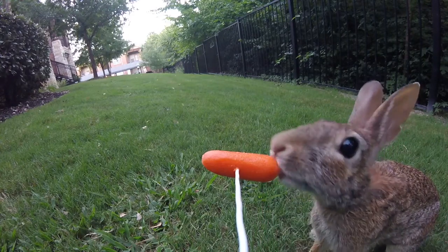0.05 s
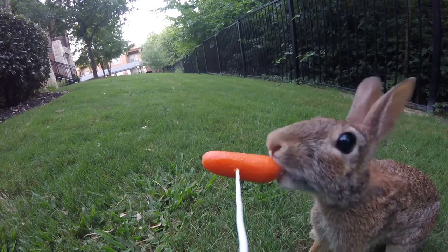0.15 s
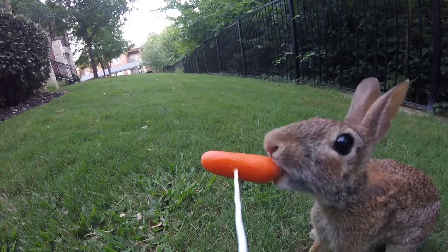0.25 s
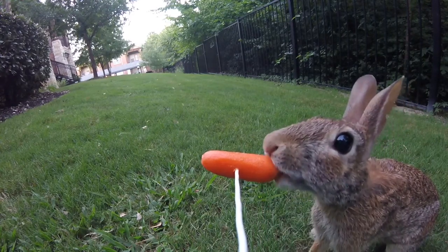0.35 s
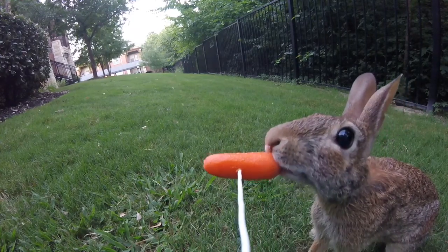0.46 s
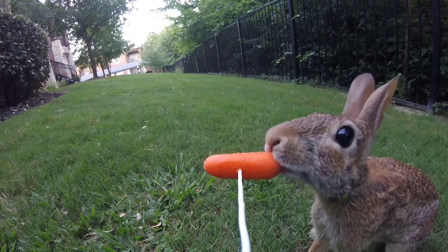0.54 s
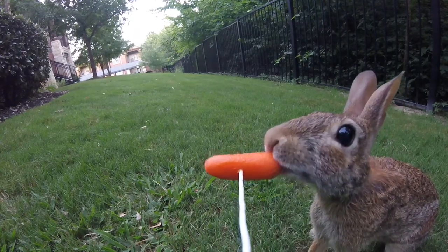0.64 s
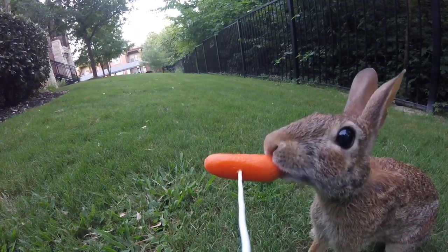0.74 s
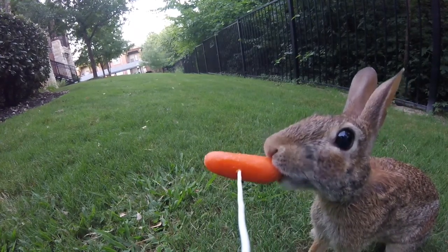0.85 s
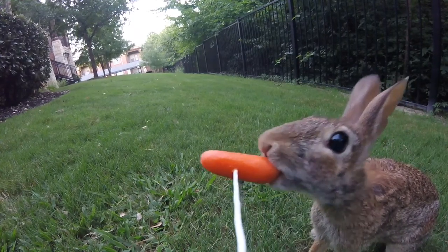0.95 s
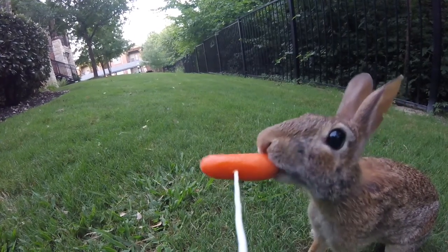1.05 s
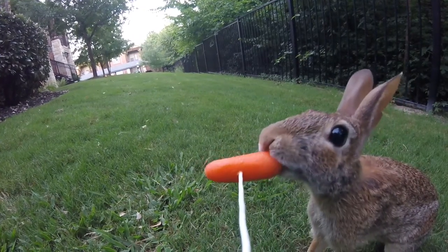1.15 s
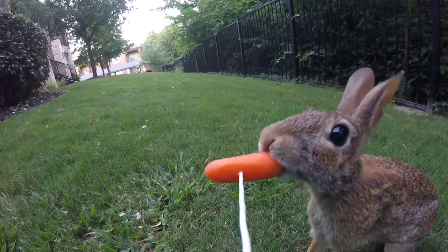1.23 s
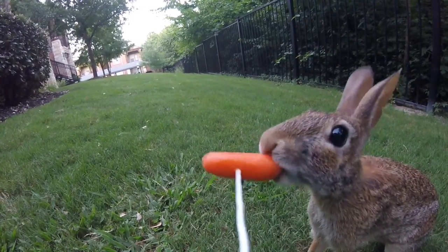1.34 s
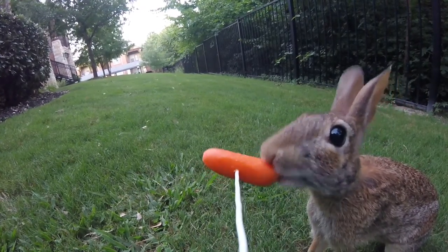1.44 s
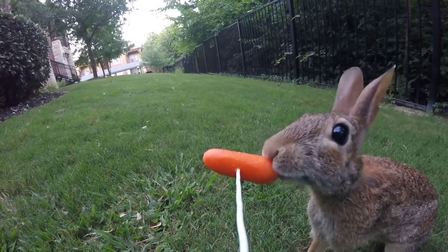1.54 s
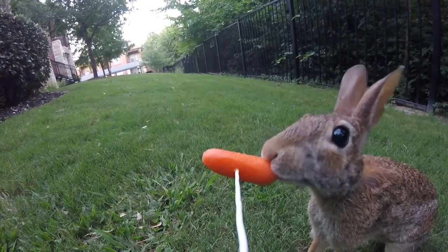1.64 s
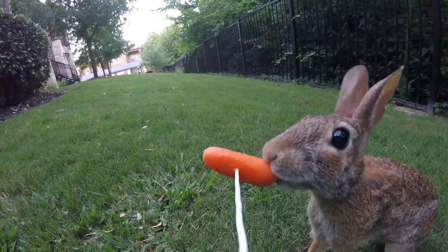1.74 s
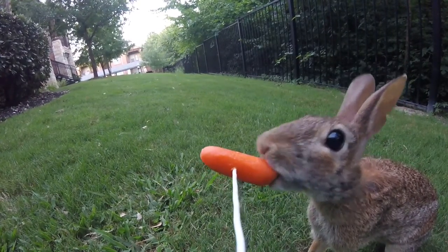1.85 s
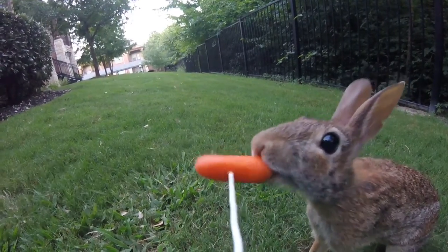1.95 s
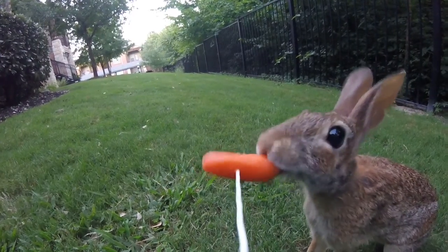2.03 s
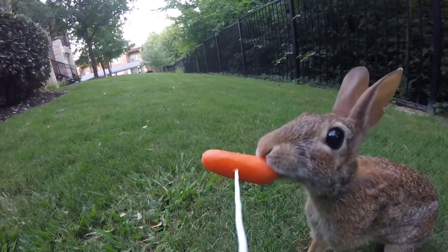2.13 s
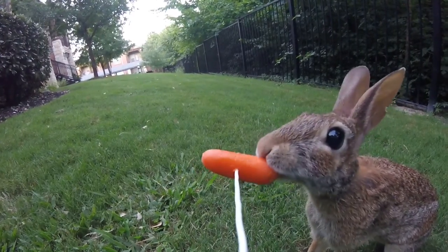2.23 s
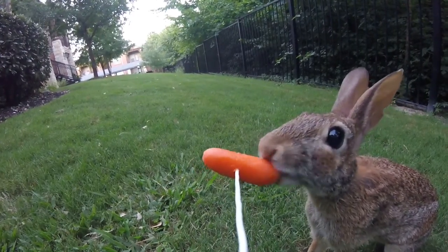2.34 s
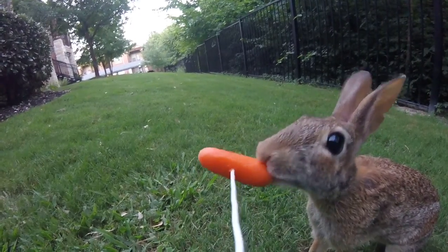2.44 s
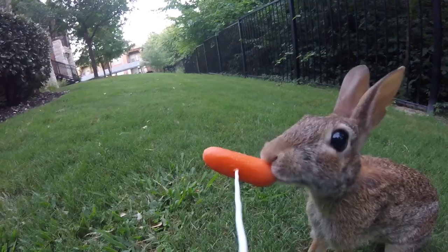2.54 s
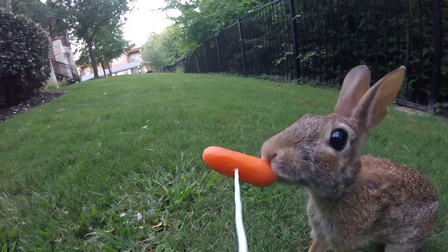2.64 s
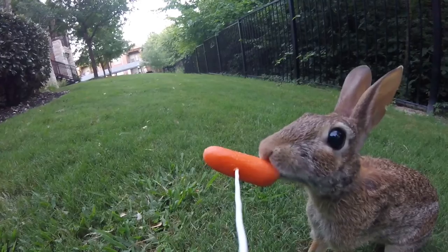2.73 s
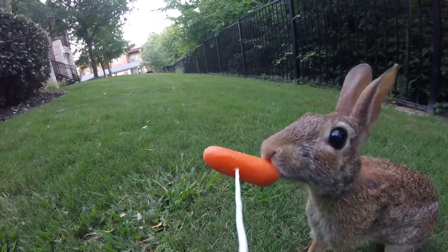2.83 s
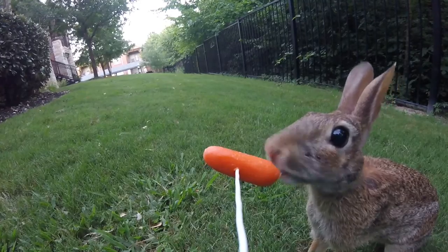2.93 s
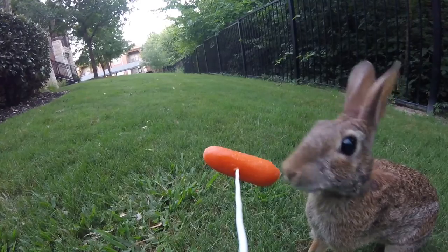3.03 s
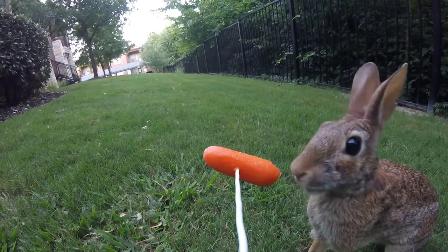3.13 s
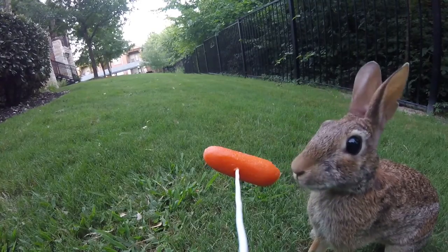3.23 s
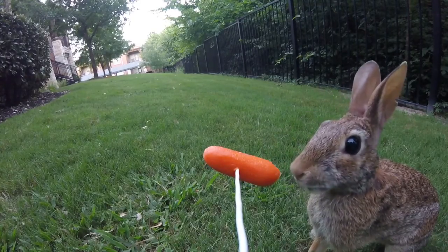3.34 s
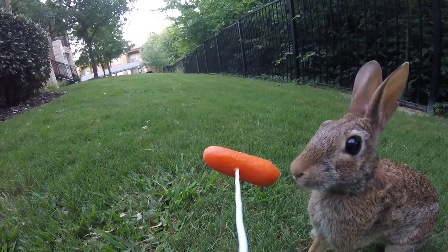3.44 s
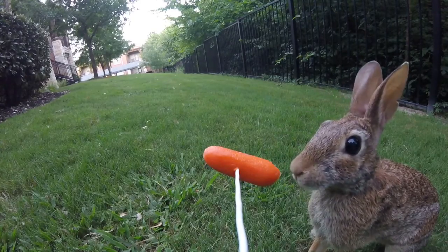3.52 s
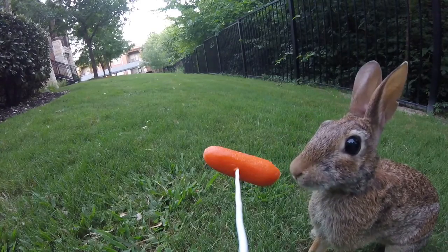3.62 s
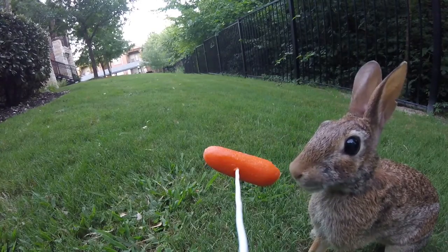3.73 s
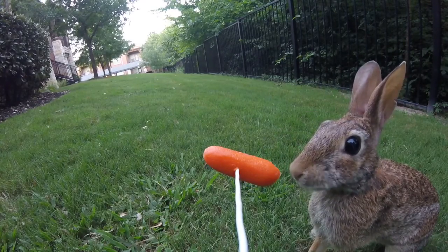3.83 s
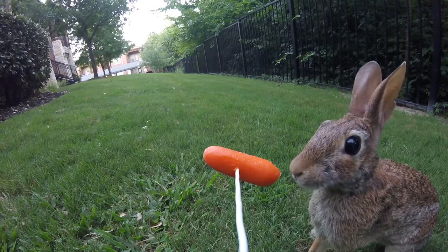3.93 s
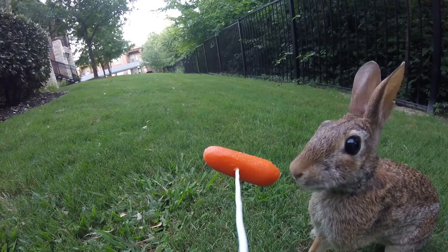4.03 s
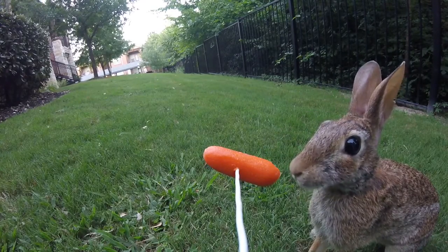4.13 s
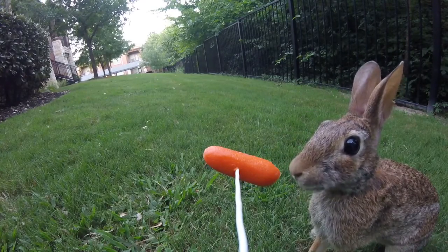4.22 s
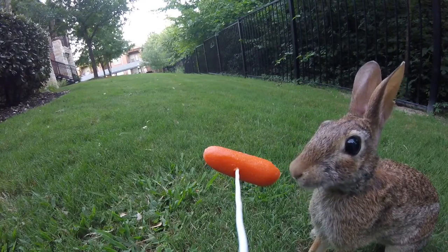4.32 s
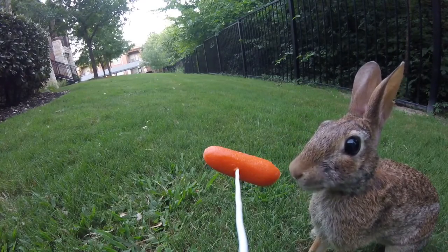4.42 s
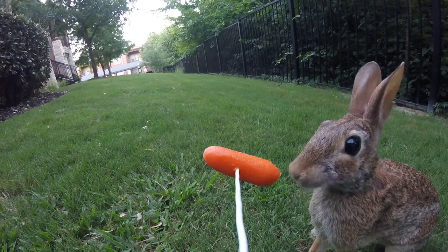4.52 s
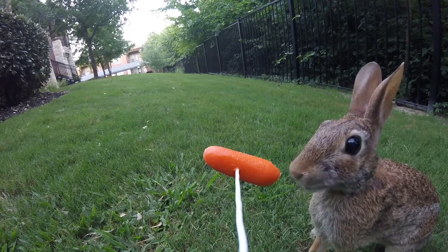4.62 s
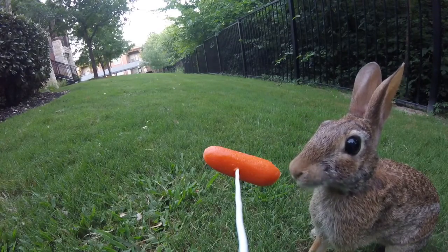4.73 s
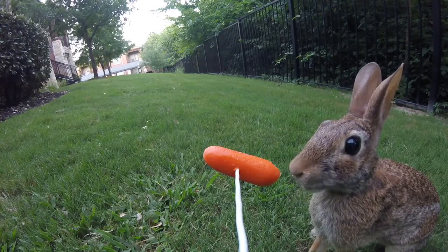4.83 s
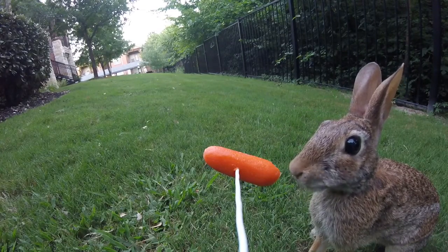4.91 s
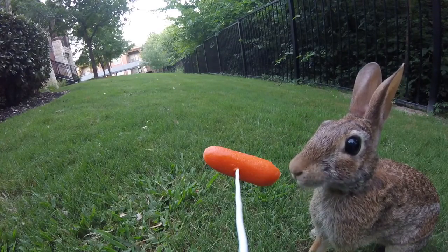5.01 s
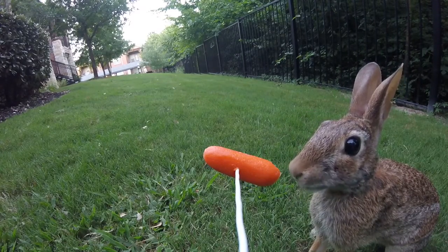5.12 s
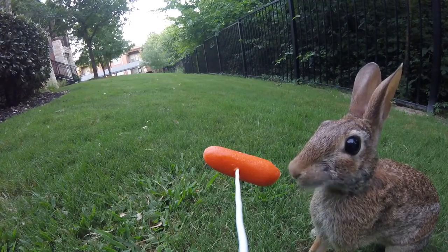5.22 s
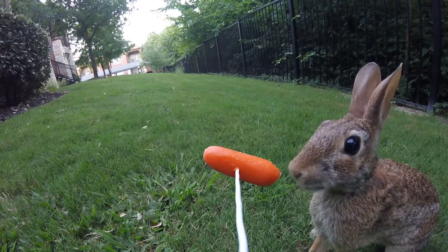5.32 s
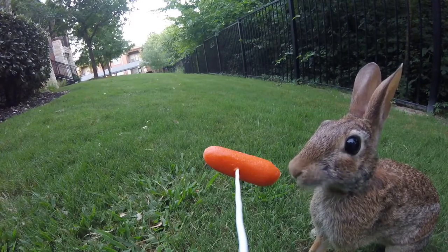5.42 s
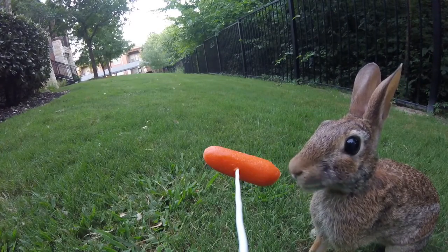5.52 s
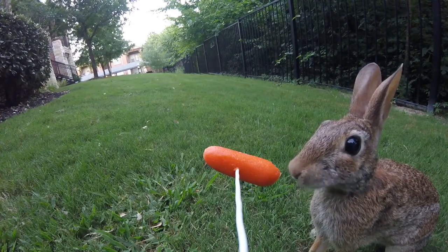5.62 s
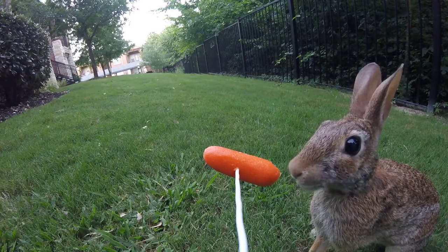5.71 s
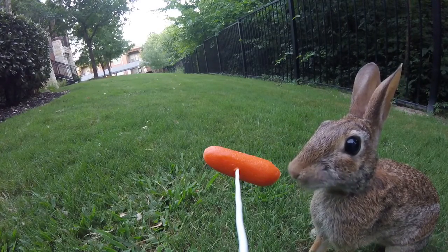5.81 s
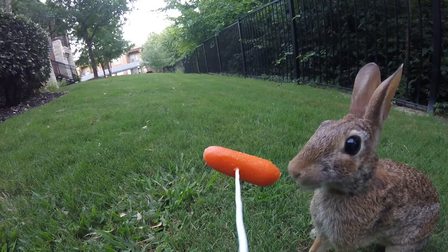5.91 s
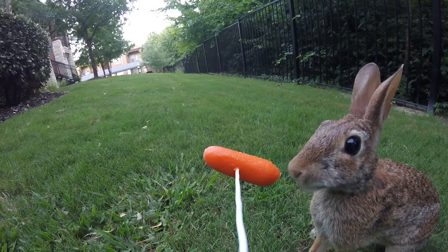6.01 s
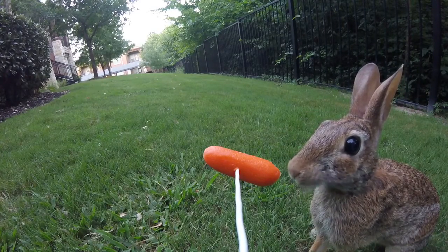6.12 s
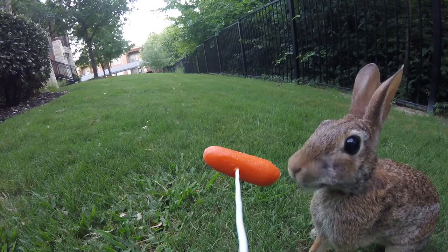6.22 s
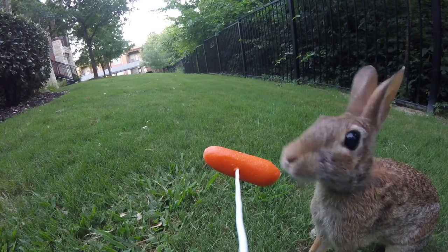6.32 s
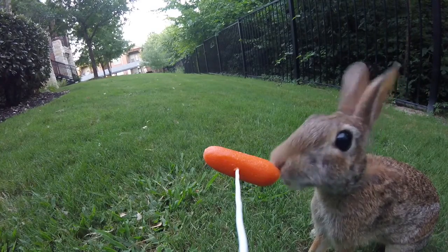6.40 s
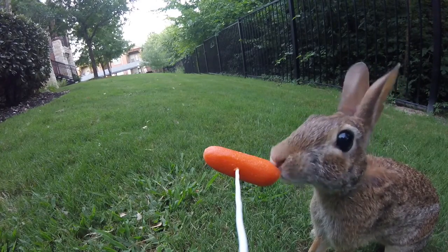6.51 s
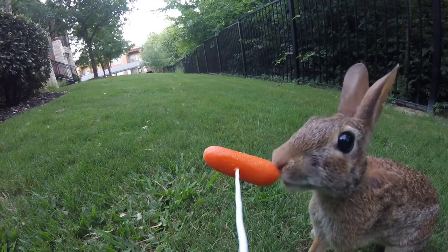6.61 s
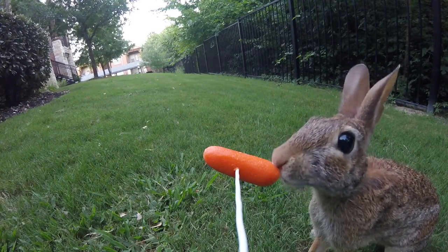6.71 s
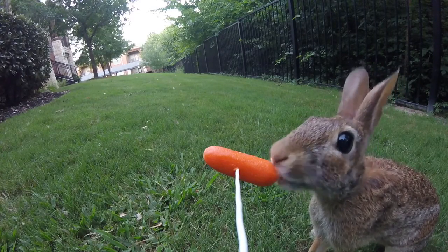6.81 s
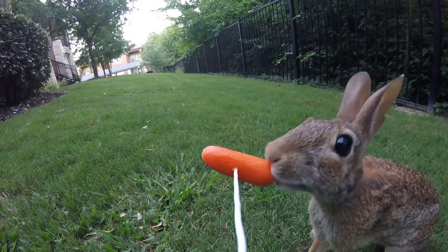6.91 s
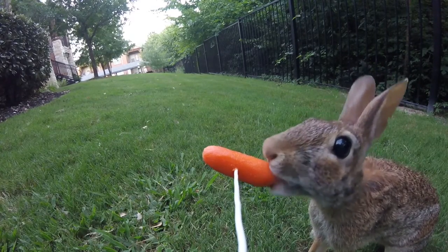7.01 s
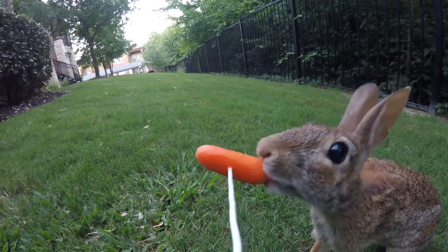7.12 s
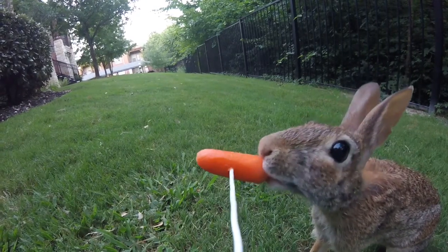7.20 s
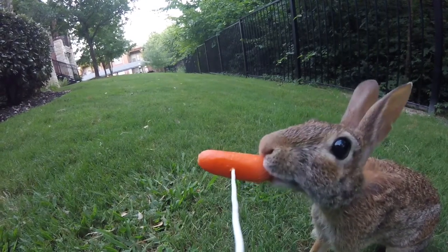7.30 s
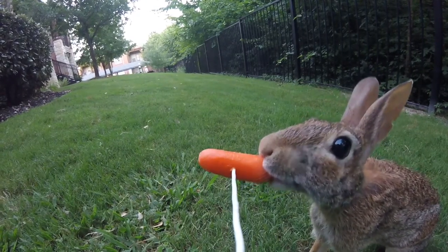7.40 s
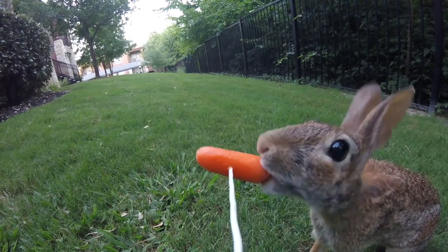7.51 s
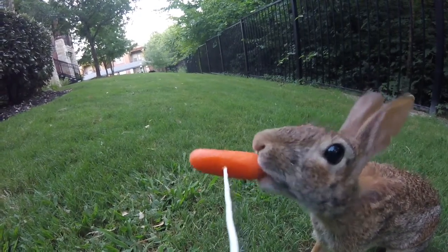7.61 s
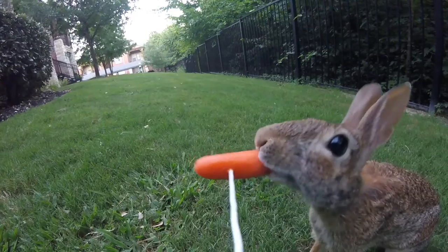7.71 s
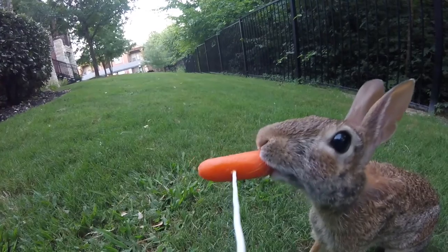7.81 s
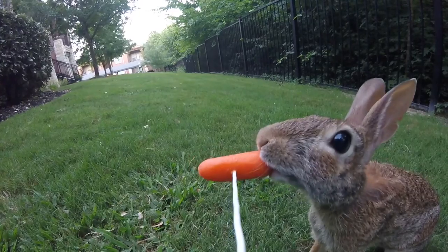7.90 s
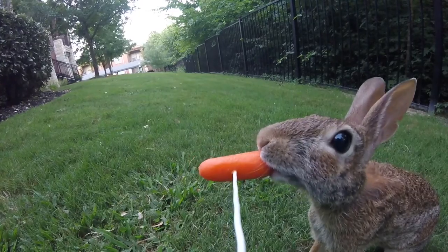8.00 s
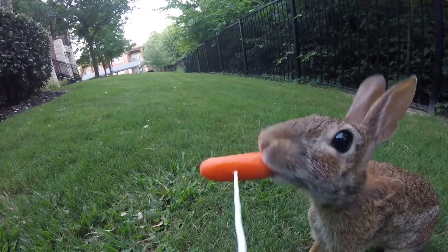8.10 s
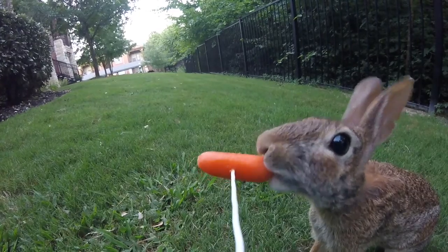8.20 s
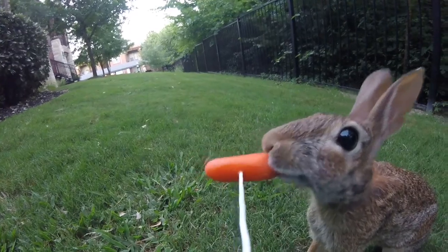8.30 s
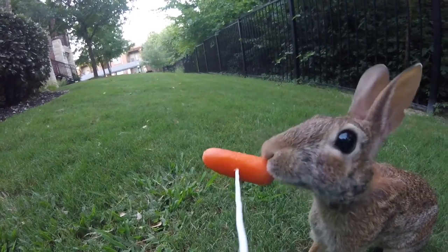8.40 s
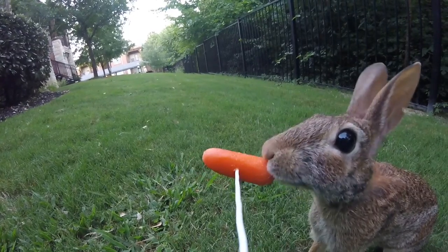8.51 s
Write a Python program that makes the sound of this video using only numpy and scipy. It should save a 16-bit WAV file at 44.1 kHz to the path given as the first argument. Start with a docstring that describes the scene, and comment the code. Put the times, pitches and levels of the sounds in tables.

```python
"""On a lawn, one microphone close to a rabbit gnawing a carrot stuck on a thin stalk. Far off, an air
conditioner, an engine and an insect chorus carry on throughout. For the first 2.5 s the teeth scrape and
the flesh snaps; each crack runs down the stalk as a bending wave and rings it. In the pause a nearer
insect rattles, and from 4.4 s a far bird whistles five times. At 6.7 s a second insect starts to sizzle,
and just after it the rabbit bites again."""
import sys
import numpy as np
from scipy import signal
from scipy.fft import rfft, irfft, next_fast_len
from scipy.io import wavfile
from scipy.ndimage import uniform_filter1d, map_coordinates

SR = 44100
rng = np.random.default_rng(int(sys.argv[2]) if len(sys.argv) > 2 else 0)


def bounce(signal):
    """Save signal as a 16-bit WAV file at the path given by the first command-line argument."""
    frames = np.transpose(np.atleast_2d(signal))
    limited = np.clip(frames, -1, 1)
    pcm = np.round(limited * 32767).astype(np.int16)
    wavfile.write(sys.argv[1], SR, pcm)


N = 377055

# Levels in the tables are relative; each source applies its own gain.
# rumble of distant town and breeze, and hiss of the open air: (frequency [Hz], level per Hz [dB])
RUMBLE_BAND = [(12, -41), (20, -2), (43, 3), (82, -1.5), (240, -10), (303, -18), (353, -15.5), (606, -23.5),
               (824, -25), (1060, -25), (1310, -25), (1530, -29), (2000, -30.5), (2600, -29), (4400, -120)]
HISS_BAND = [(1500, -12), (2000, -21), (2300, -7), (2900, -3), (3600, 2), (4660, -14), (5870, -17),
             (6500, -3.5), (7100, -8.5), (9200, -13), (10200, -21), (11000, -14), (12600, -22.5),
             (13800, -26), (14500, -50)]
# harmonics of the two far machines: (multiple of shaft speed, level [dB])
AIR_CONDITIONER = [(1, 3), (2, -6.5), (3, -18), (4, -9.5), (5, -62), (6, -13), (7, -12.5), (8, -16.5),
                   (9, -17.5), (10, -43), (11, -22), (12, -56), (13, -24.5), (14, -16), (15, -22.5),
                   (16, -20), (17, -29)]
ENGINE = [(1, 2), (2, -11), (3, -8.5), (4, -9.5), (5, -11.5), (6, -15), (7, -13), (8, -14.5), (9, -30),
          (10, -32)]
# loudness of the insect chorus all around: (time [s], level [dB])
CHORUS_LEVEL = [(0.0, -54), (0.95, -54), (1.32, -57.5), (4.7, -58), (4.93, -58), (5.47, -62), (6.44, -65),
                (6.7, -63)]
# spectra of the chorus and of the two nearer insects: (frequency [Hz], level per Hz [dB])
CHORUS_BAND = [(1410, -57), (2400, -52), (2590, -16), (2950, -4.5), (3160, -1.5), (3460, 1.5), (3830, 3),
               (4000, 0.5), (4470, -5), (5240, -3), (6300, -0.5), (6700, -5.5), (7070, -20), (7600, -16),
               (9880, -39), (16700, -120)]
RATTLE_BAND = [(1600, -13), (2250, 2.5), (2700, 0.5), (3150, 1.5), (3700, 8.5), (4300, -12.5), (4800, -10),
               (5300, -3), (5800, -15), (6450, 4.5), (6900, -9), (7400, -2.5), (9000, -19.5), (10000, -18)]
SIZZLE_BAND = [(2000, -8), (2700, -6.5), (3600, -0.5), (4600, -16), (5600, -16), (6500, -5), (7100, -9.5),
               (8000, -9.5), (9800, -29), (11000, -14.5), (12200, -47)]
# the far bird's song: (time [s], level [dB], kind of whistle)
WHISTLES = [(4.39, -47, "falling"), (4.95, -46, "falling"), (5.5, -37.5, "rising"), (5.899, -39, "rising"),
            (6.3, -38.5, "rising")]
# its two kinds of whistle: (time into the note [s], pitch [Hz], level [dB])
FALLING = [(0, 3280, -3), (0.05, 3050, -2), (0.12, 2260, -13), (0.18, 1980, -6), (0.23, 1830, -1)]
RISING = [(0, 1600, -19), (0.078, 1953, -7), (0.095, 2396, -8), (0.105, 2880, -5), (0.123, 3170, -3.5),
          (0.14, 3480, -3)]
# the stalk springs back: (time [s], level [dB])
SWAYS = [(0.542, -15.5), (1.926, -19), (2.025, -19), (7.273, -23), (8.296, -20.5), (8.354, -16.5)]
# strokes of the teeth through the flesh: (time [s], swell [s], ease [s], level [dB], brightness [dB])
STROKES = [(0.205, 0.11, 0.021, -37.5, -16), (0.314, 0.093, 0.096, -28, 0),
           (0.549, 0.0078, 0.061, -33, -13), (0.97, 0.075, 0.1, -32.5, 1.5),
           (1.364, 0.016, 0.076, -41.5, -26), (1.46, 0.026, 0.075, -32.5, -7),
           (1.916, 0.02, 0.044, -22, -4.5), (1.987, 0.038, 0.06, -26.5, -4.5),
           (2.405, 0.055, 0.06, -29, -2.5), (7.105, 0.042, 0.044, -24.5, 0.5),
           (7.192, 0.081, 0.045, -31.5, -5), (7.602, 0.11, 0.054, -31, 1.5),
           (8.246, 0.048, 0.11, -29.5, -3)]
# spectra of scraped and of splitting flesh: (frequency [Hz], level per Hz [dB])
SCRAPE_BAND = [(70, 0), (120, -3.5), (160, -12.5), (210, -1), (280, 3.5), (380, -7), (520, 2.5), (630, -13),
               (820, -4.5), (1050, -15.5), (1280, -10), (1650, -15), (2000, -30.5), (2800, -26.5),
               (3600, -20.5), (4600, -41), (8000, -44)]
TEAR_BAND = [(100, -6), (2200, 4), (4000, -1.5), (5500, -14), (6400, 3), (7300, -18), (9500, -24.5),
             (12000, -27), (14000, -50)]
# modes of the carrot on its stalk: (frequency [Hz], level [dB], t60 [s])
STALK_MODES = [(101, -11, 0.047), (173, -11, 0.042), (265, -4, 0.058), (334.4, -6, 0.084), (428, 4, 0.025),
               (463, 1, 0.056), (545, -5, 0.035), (681, -5, 0.035), (824, -3, 0.041), (970, -6, 0.015),
               (1248, -8, 0.028), (1280, -1.5, 0.019), (1480, -2, 0.013), (2054, -22, 0.052),
               (2186, -14.5, 0.023), (3010, -20.5, 0.012), (3567, -10, 0.019), (3890, -17, 0.0091),
               (4660, -18.5, 0.0071), (6250, -22.5, 0.0037)]
# clear cracks in the carrot, the last three columns relative to the ring:
# (time [s], ring [dB], low knock [dB], crispness [dB], sparkle [dB])
SNAPS = [(0.394, -27.5, 6.5, -4.5, -17), (0.488, -44, 12.5, 1, -17), (0.538, -20.5, -17, -10.5, -16),
         (0.543, -22, 5.5, -11, -30), (1.1, -34.5, 0, -22, -22), (1.14, -15.5, -5.5, -15, -25.5),
         (1.199, -24, -4, -9, -18), (1.63, -19.5, -0.5, -13, -25), (1.91, -30, 2.5, -16, -36),
         (1.927, -27, 10, -7, -21), (1.949, -29.5, 2.5, -14, -31), (1.983, -20.5, 2, -11.5, -15.5),
         (2.009, -26, 6, -25, -20), (2.053, -31, 3, -8.5, -13), (2.486, -36, 4, -8.5, -32),
         (6.909, -39.5, 1.5, -13, -27), (7.163, -31, 4, -10, -33), (7.223, -33.5, -19, -8, -23),
         (7.25, -37, 7, -15, -23), (7.274, -29.5, 7.5, -8, -25), (7.59, -42, 14.5, -20, -9.5),
         (7.62, -27.5, 2.5, -9.5, -36), (7.675, -17.5, -1, -13, -26), (7.694, -30, 0, -13, -22),
         (7.712, -29.5, 0, -19, -32), (7.755, -35.5, 4.5, -21, -34), (8.094, -33.5, 9, -10.5, -42),
         (8.275, -30, -1, -16, -24), (8.33, -36, -10, -25, -15), (8.355, -21, 4.5, -9.5, -13)]


def amp(db):
    """Decibels to gain."""
    return 10 ** (np.asarray(db) / 20)


def unit(x):
    """Scale to rms 1."""
    return x / np.sqrt(np.mean(x ** 2) + 1e-20)


def curves(rows):
    """One value per sample for each column after the time."""
    times, *columns = np.transpose(rows)
    return [np.interp(np.arange(N) / SR, times, column) for column in columns]


def during(rows):
    """A soft gate, open from the first row's time to the last's."""
    t = np.arange(N) / SR
    return uniform_filter1d(1. * ((t > rows[0][0]) & (t < rows[-1][0])), size=400)


def wobble(knots_per_s):
    """A smooth random curve."""
    knots = rng.standard_normal(int(N * knots_per_s / SR) + 4)
    return map_coordinates(knots, [np.arange(N) * knots_per_s / SR])


def filtered(x, response):
    """Filter x by a complex response of frequency."""
    size = next_fast_len(len(x) + 8192)
    return irfft(rfft(x, size) * response(np.fft.rfftfreq(size, 1 / SR)), size)[:len(x)]


def lowpass(x, edge_hz):
    """Roll off the treble without shifting phase."""
    return filtered(x, lambda hz: 1 / (1 + (hz / edge_hz) ** 8))


def coloured(x, band):
    """Shape x by (frequency [Hz], level [dB]) points, at rms 1."""
    band_hz, db = np.transpose(band)
    return unit(filtered(x, lambda hz: amp(np.interp(np.log(hz + 1), np.log(band_hz), db, -120, -120))))


def noise(band):
    """Coloured noise of rms 1."""
    return coloured(rng.standard_normal(N), band)


def add(track, start_s, sound):
    """Mix a sound into the track."""
    part = track[max(round(start_s * SR), 0):][:len(sound)]
    part += sound[:len(part)]


def hum(shaft_hz, harmonics, drift, flutter_db):
    """A far machine: multiples of its shaft speed, each fading in and out on its way through the air."""
    angle = 2 * np.pi * np.cumsum(shaft_hz * (1 + drift * wobble(2))) / SR
    return unit(sum(amp(db + flutter_db * wobble(4)) * np.sin(k * angle + rng.uniform(0, 2 * np.pi))
                    for k, db in harmonics))


def neighbourhood(fade_db_per_s=0.1456):
    """Beyond the lawn, machine hum and rumble fade slightly under the steady hiss of the open air."""
    air_conditioner = amp(-47) * hum(59.2, AIR_CONDITIONER, drift=0.00057, flutter_db=1.5)
    engine = amp(-42.5) * hum(36.9, ENGINE, drift=0.00405, flutter_db=2)
    rumble = amp(-42 + 1.1 * wobble(2.805)) * noise(RUMBLE_BAND)
    fade = amp(-fade_db_per_s * np.arange(N) / SR)
    return fade * (air_conditioner + engine + rumble) + amp(-58) * noise(HISS_BAND)


def insect_chorus():
    """Far insects all around blend into one smooth buzz."""
    level_db, = curves(CHORUS_LEVEL)
    return amp(level_db + 6 + 0.44 * wobble(14)) * noise(CHORUS_BAND)


def near_insect(band, start_s, stop_s, settled_hz, tiring_db_per_s, depth_db):
    """A nearer insect's buzz swells, tires and dies away; its pulses start in a hurry, then settle."""
    attack_s, release_s = 0.2, 0.13
    hurry, settle_s = 0.736, 0.32
    t = np.arange(N) / SR
    age, since_stop = np.maximum(t - start_s, 0), np.maximum(t - stop_s, 0)
    envelope = (1 - np.exp(-age / attack_s)) * np.exp(-since_stop / release_s)
    pulse_hz = settled_hz * (1 + hurry * np.exp(-age / settle_s)) * (t > start_s)
    pulse = np.cos(np.pi * np.cumsum(pulse_hz) / SR) ** 4
    buzz = unit(amp(depth_db * pulse + 0.96 * wobble(13)) * noise(band))
    return amp(-tiring_db_per_s * age) * envelope * buzz


def bird(echo_t60=0.6, echo_delay_s=0.025):
    """Two falling and three rising whistles from far off, scattered by trees and houses."""
    song = np.zeros(N)
    for start, level_db, kind in WHISTLES:
        note = np.array(RISING if kind == "rising" else FALLING) + [start, 0, level_db]
        hz, db = curves(note)
        song += during(note) * amp(db + 2.2 * wobble(70)) * np.sin(2 * np.pi * np.cumsum(hz) / SR)
    t = np.arange(SR // 2) / SR
    tail = rng.standard_normal(len(t)) * amp(-60 * t / echo_t60) * (t > echo_delay_s)
    echo = signal.fftconvolve(song, tail / np.linalg.norm(tail))[:N]
    return song + amp(-2) * echo


def short_reflections(x, echo_db=-17, count=7):
    """The direct sound plus a few weak copies 2-16 ms later, giving a faint, steady comb colouring."""
    delays_s = rng.uniform(0.002, 0.016, count)
    return x + amp(echo_db) * sum(np.pad(x, (round(delay * SR), 0))[:N] for delay in delays_s)


def stalk_sway(sway_hz=40, t60=0.38, rise_s=0.0083):
    """Let go, the loaded stalk swings with a low throb beside the microphone."""
    t = np.arange(SR // 2) / SR
    swing = amp(-60 * t / t60) * (1 - np.exp(-t / rise_s)) * np.sin(2 * np.pi * sway_hz * t)
    track = np.zeros(N)
    for start, db in SWAYS:
        add(track, start, amp(db - 2) * swing)
    return track


def jaw_pressure_db(age, swell_s, ease_s):
    """The jaw presses ever harder, then eases off."""
    return np.interp(age, [0, swell_s, swell_s + ease_s], [-8, 0, -10])


def teeth_scrape(cells_per_s=1900, spread_db=3, clump_db=2.5, grip_s=0.01):
    """Right at the microphone, cells burst in clumps as the teeth catch and slip through the flesh."""
    clumps = amp(clump_db * wobble(130))
    sizes = amp(spread_db * np.clip(rng.standard_normal(N), -2, 2)) * rng.choice([-1, 1], N)
    bursts = rng.random(N) < cells_per_s / SR
    rasp = coloured(bursts * sizes * clumps, SCRAPE_BAND)
    dull = lowpass(rasp, 650)
    bright = rasp - dull
    track = np.zeros(N)
    for start, swell_s, ease_s, db, bright_db in STROKES:
        stroke = slice(round(start * SR), round((start + swell_s + ease_s) * SR))
        grit = unit(dull[stroke] + amp(bright_db) * bright[stroke])
        age = np.arange(len(grit)) / SR
        grip = np.minimum(np.minimum(age, age[::-1]) / grip_s, 1)  # the teeth catch and let go
        track[stroke] += amp(db + jaw_pressure_db(age, swell_s, ease_s)) * grip * grit
    return track


def crack(ring_db, knock_db, crisp_db, sparkle_db, tear_t60=0.021, travel_s_at_1khz=0.00098):
    """The flesh splits and rings the stalk; every bite grips it a little differently."""
    t = np.arange(SR // 8) / SR
    lead = SR // 200  # 5 ms ahead of the crack
    hz, db, t60 = np.transpose(STALK_MODES)[:, :, None]
    detune, strength, sign = rng.standard_normal((3, len(STALK_MODES), 1))
    decays = np.sign(sign) * amp(db + 2 * strength - 60 * t / t60)
    modes = decays * np.sin(2 * np.pi * hz * (1 + 0.051 * detune) * t)
    burst = amp(-60 * t / tear_t60) * rng.standard_normal(len(t))
    tear = coloured(np.pad(burst, (lead, 0)), TEAR_BAND)
    ring = np.pad(modes.sum(0), (lead, 0)) + amp(-31) * tear
    # bending waves: the treble runs faster and arrives first
    ring = filtered(ring, lambda f: np.exp(-4j * np.pi * travel_s_at_1khz * np.sqrt(f * 1000)))
    low, mid, high = [lowpass(ring, edge_hz) for edge_hz in (650, 1900, 4800)]
    bands = [(low, knock_db), (mid - low, 0), (high - mid, crisp_db), (ring - high, sparkle_db)]
    attack = slice(lead, lead + SR // 100)  # each band's level holds for the first 10 ms
    return sum(amp(ring_db + band_db) * band / band[attack].std() for band, band_db in bands)


def crackles(cracks_per_s=21, offset_db=-11.5, spread_db=2.5):
    """Small cracks come by chance during the strokes, stronger as the teeth press harder."""
    track = np.zeros(N)
    for start, swell_s, ease_s, stroke_db, _ in STROKES:
        length_s = swell_s + ease_s
        for age in rng.uniform(0, length_s, round(length_s * cracks_per_s)):
            scrape_db = stroke_db + jaw_pressure_db(age, swell_s, ease_s)
            ring_db = scrape_db + offset_db + spread_db * rng.standard_normal()
            add(track, start + age, crack(ring_db, knock_db=6, crisp_db=-9, sparkle_db=-24))
    return track


def carrot_snaps():
    """Closest and loudest, the carrot breaks under the incisors."""
    track = np.zeros(N)
    for start, *levels_db in SNAPS:
        add(track, start - 0.005, crack(*levels_db))  # early by the crack's 5 ms lead
    return track


def scene():
    """Mono, from one spot on the lawn: the rabbit up close and dry, the garden behind."""
    chorus = insect_chorus()
    rattle = amp(-47.5) * near_insect(RATTLE_BAND, start_s=2.851, stop_s=5.06, settled_hz=20.33,
                                      tiring_db_per_s=0.3, depth_db=9)
    sizzle = amp(-47) * near_insect(SIZZLE_BAND, start_s=6.742, stop_s=8.55, settled_hz=21.74,
                                    tiring_db_per_s=3.5, depth_db=5)
    wildlife = chorus + rattle + sizzle + amp(-6.5) * bird()
    garden = amp(-2) * short_reflections(wildlife) + neighbourhood()
    rabbit = carrot_snaps() + teeth_scrape() + stalk_sway() + crackles()
    return (garden + rabbit)[None]


def record(dry):
    """The camera behind the microphone keeps nothing above 14.3 kHz."""
    return np.array([filtered(channel, lambda hz: hz < 14300) for channel in dry])


dry = scene()
out = record(dry)
bounce(out)
```